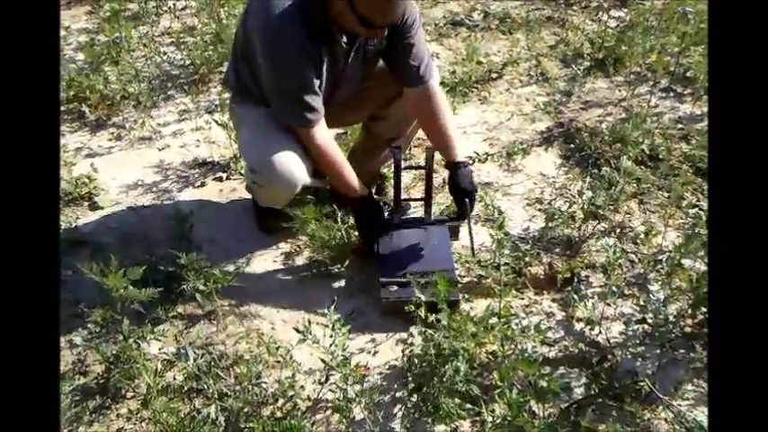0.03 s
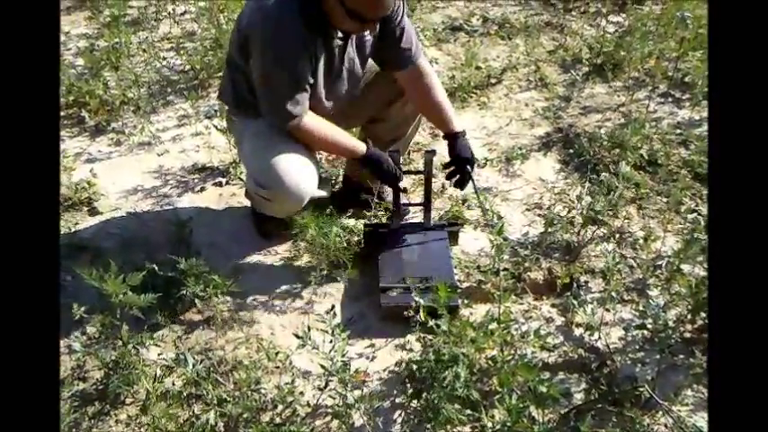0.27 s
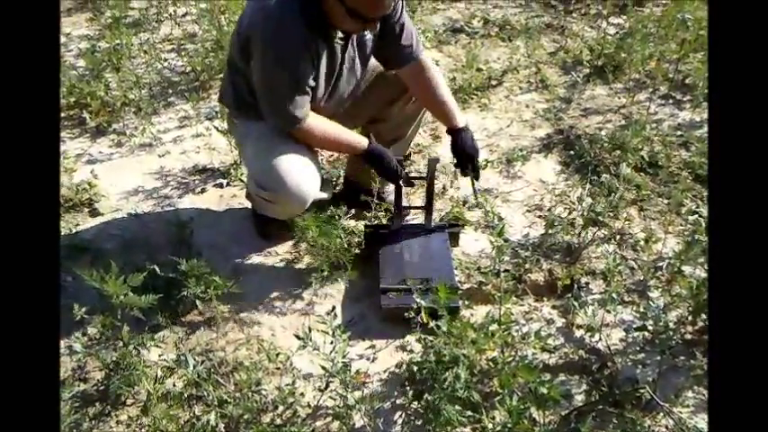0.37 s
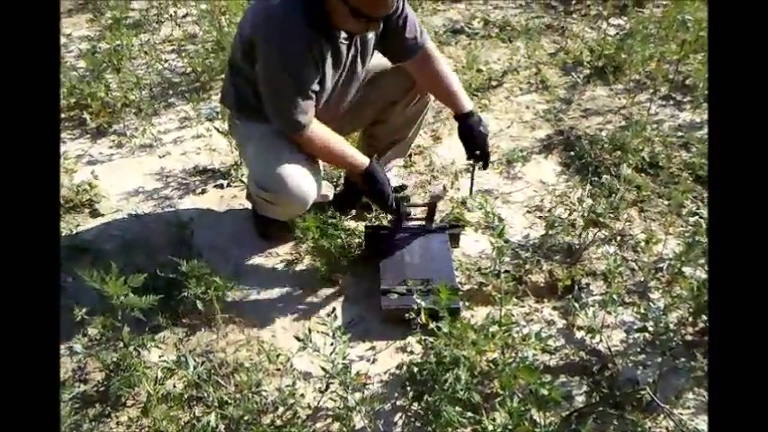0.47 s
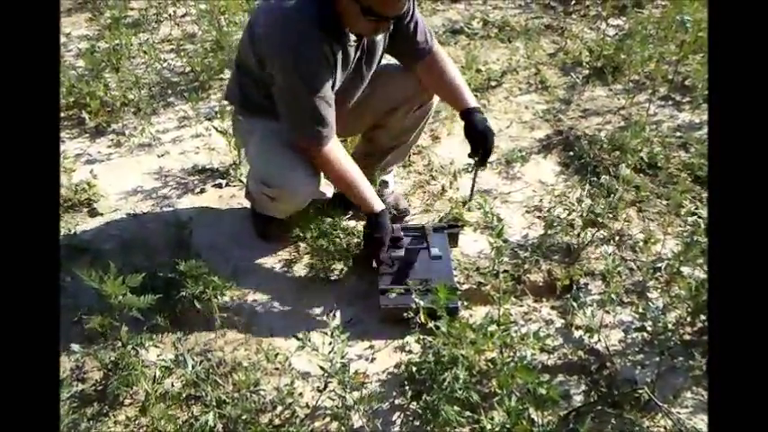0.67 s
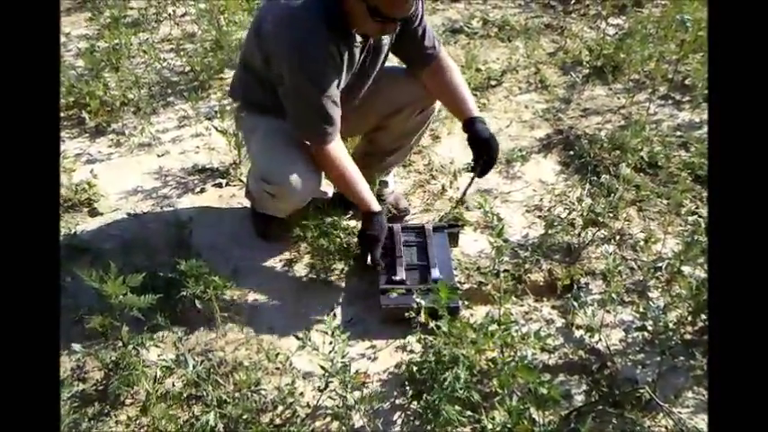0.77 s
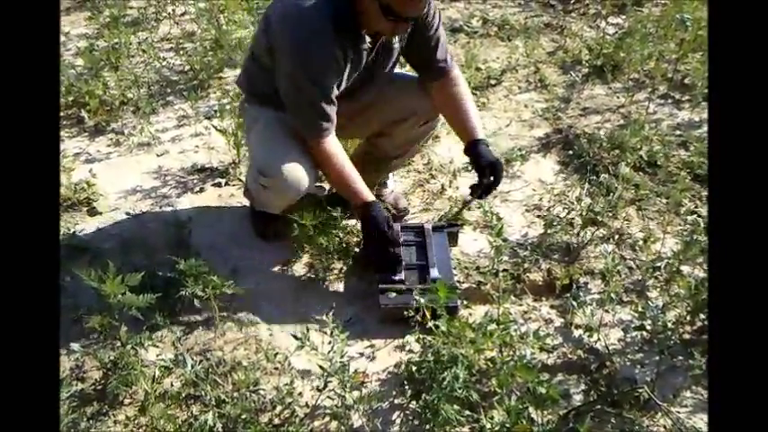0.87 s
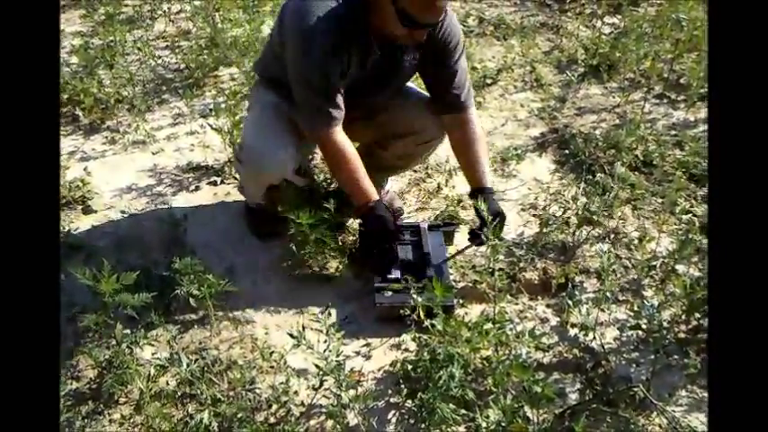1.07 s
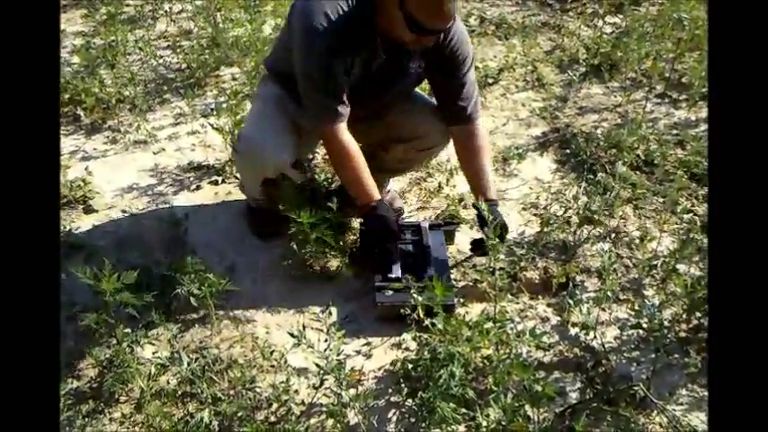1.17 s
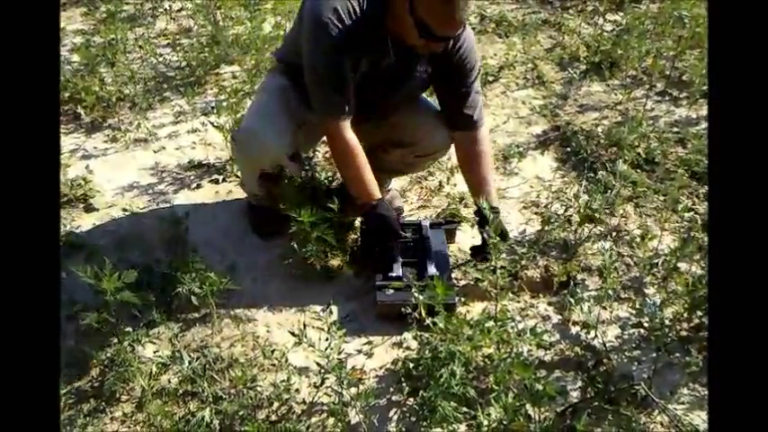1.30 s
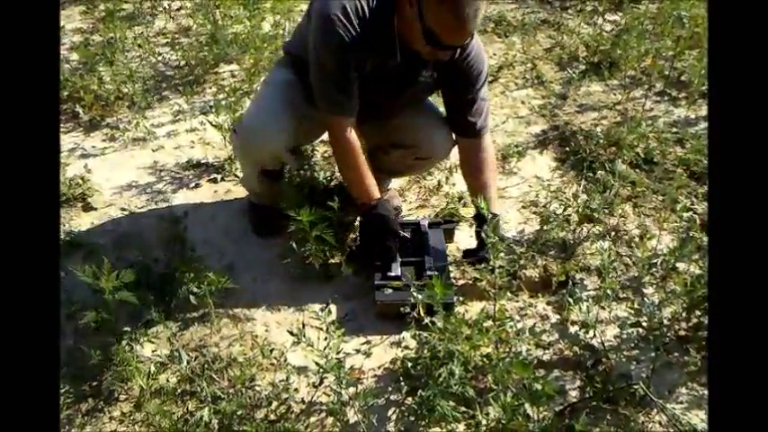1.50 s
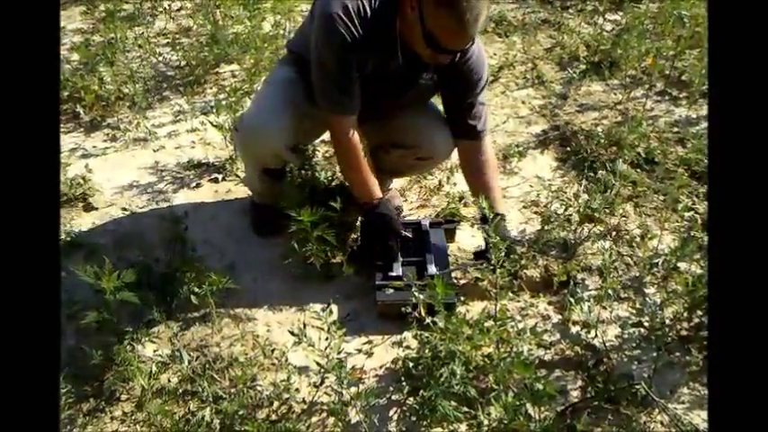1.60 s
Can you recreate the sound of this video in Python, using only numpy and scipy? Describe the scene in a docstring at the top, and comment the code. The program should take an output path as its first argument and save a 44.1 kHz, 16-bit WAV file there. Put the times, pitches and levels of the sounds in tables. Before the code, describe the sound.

Two sharp, rattling metal clanks come under a second apart as a steel device is closed outdoors, the first after a light tap, the second after a soft knock. They distort slightly above a low rumble and faint whirr.

```python
"""A steel device is folded shut by hand on dry ground, over a low rumble and a small drive's faint whirr.
Its arms give a light ringing tap (0.23 s), then the lid hits its catch with a hard clank (0.35 s).
A hand brushes the steel (0.95 s), the case takes a dull knock (1.05 s) and the frame clanks shut (1.13 s).
Each clank is a short rattle of contacts that rings the steel's modes and overloads the microphone."""
import sys
import numpy as np
from scipy import signal
from scipy.fft import rfft, irfft, next_fast_len
from scipy.io import wavfile
from scipy.ndimage import map_coordinates

SR = 44100
rng = np.random.default_rng(int(sys.argv[2]) if len(sys.argv) > 2 else 0)


def to_wav(s):
    """Save 16-bit WAV."""
    ch = np.atleast_2d(s).T  # columns
    pcm = np.round(np.clip(ch, -1, 1) * 32767)  # PCM
    wavfile.write(sys.argv[1], SR, pcm.astype(np.int16))


N = 72765
TIME_S = np.arange(N) / SR


def amp(db):
    """Decibels to gain."""
    return 10 ** (np.asarray(db) / 20)


def along(points, hz):
    """Interpolate (frequency, value) points on a log frequency axis."""
    knots_hz, values = np.transpose(points)
    return np.interp(np.log(hz + 1), np.log(knots_hz + 1), values)


def noise(response):
    """Noise of rms 1, coloured by the gain response(hz)."""
    size = next_fast_len(N + 8192)
    spectrum = rfft(rng.standard_normal(N), size) * response(np.fft.rfftfreq(size, 1 / SR))
    x = irfft(spectrum, size)[:N]
    return x / np.sqrt(np.mean(x ** 2) + 1e-20)


def wobble(rate_hz):
    """Smooth random curve with knots at rate_hz."""
    knots = rng.standard_normal(int(N * rate_hz / SR) + 4)
    return map_coordinates(knots, [TIME_S * rate_hz])


def add(out, x, start_s):
    """Mix x into out from start_s."""
    i = round(start_s * SR)
    out[i:] += x[:N - i]


def swish(offset_s, sigma_s, centre_hz, sigma_hz, peak_db):
    """Gaussian swell of narrow-band noise around offset 0."""
    envelope = amp(peak_db) * np.exp(-.5 * (offset_s / sigma_s) ** 2)
    return envelope * noise(lambda hz: np.exp(-.5 * ((hz - centre_hz) / sigma_hz) ** 2))


def background():
    """Fluttering rumble and hiss with a weak, slightly unsteady hum."""
    # hum lines (frequency [Hz], rms level [dB])
    lines = [(91, -46.5), (137, -49.5), (455, -49), (980, -46.5)]
    # rumble and hiss spectrum (frequency [Hz], relative density [dB])
    spectrum = [(30, -35), (65, -17), (85, -1), (160, 1), (450, 1), (820, -2.5), (1100, 1), (1850, 1),
                (2250, -9), (2550, -4.5), (3000, -13.5), (4000, -9), (5300, -7), (6500, -10.5),
                (7200, -19.5), (7700, -38.5)]
    hum = sum(amp(db) * np.sqrt(2) * np.sin(2 * np.pi * hz * TIME_S + .5 * wobble(7.06))
              for hz, db in lines)
    rumble_db = -30.5 + 0.45 * wobble(40.1)
    return hum + amp(rumble_db) * noise(lambda hz: amp(along(spectrum, hz)))


def drive():
    """A small mechanism rubs and ticks at the same places in every turn."""
    # swells per turn (time [s], sigma [s], centre [Hz], sigma [Hz], peak [dB])
    swells = [(0.046, 0.0089, 1210, 50, -33), (0.1002, 0.01, 1197, 45, -31.5),
              (.1405, 0.0036, 2020, 720, -28), (0.01, 0.0053, 1750, 230, -32)]
    turn_s = .1772
    return sum(swish((TIME_S - at_s + turn_s / 2) % turn_s - turn_s / 2, *shape)
               for at_s, *shape in swells)


def clatter(tilt_db_oct, t60_scale):
    """Dense sheet-steel modes: noise, tilted above about 1.5 kHz, that dies band by band."""
    # spectrum before tilt (frequency [Hz], relative density [dB])
    spectrum = [(60, -24.5), (200, -16.5), (550, -5), (1000, -3.5), (1900, 2.5), (2700, -1.5), (4300, -5.5),
                (5500, -1), (6700, 5.5), (7050, -2), (7400, -13)]
    # decay before scaling (frequency [Hz], t60 [s])
    decay = [(100, .09), (600, .11), (2000, 0.094), (4000, 0.11), (7000, .11)]
    steady = noise(lambda hz: amp(along(spectrum, hz) + tilt_db_oct * np.log2(1 + hz / 1500)))
    band_hz, age_s, bands = signal.stft(steady, SR, nperseg=256)
    t60_s = t60_scale * along(decay, band_hz)[:, None]
    fade = np.exp(-np.log(1000) * age_s / t60_s)
    return signal.istft(bands * fade, SR, nperseg=256)[1][:N]


def struck(modes, hits, tilt_db_oct, t60_scale, jitter_rad):
    """Each contact feeds energy into the part's modes and sets off a new clatter."""
    out = np.zeros(N)
    modes_rms = np.sqrt(sum(amp(db) ** 2 for _, db, _ in modes) / 2)
    for hz, mode_db, t60_s in modes:
        energy = np.zeros(N)
        fade = np.exp(-np.log(1000) * TIME_S / t60_s)
        for at_s, ring_db, _ in hits:
            gain = amp(mode_db + ring_db + rng.standard_normal())
            add(energy, (gain * fade) ** 2, at_s)
        phase_rad = 2 * np.pi * (hz * TIME_S + rng.random()) + jitter_rad * wobble(120)
        out += np.sqrt(energy) / modes_rms * np.sin(phase_rad)
    for at_s, _, clatter_db in hits:
        add(out, amp(clatter_db) * clatter(tilt_db_oct, t60_scale), at_s)
    return out


def hand_brush():
    """A hand brushes the steel: a brief high hiss."""
    return swish(TIME_S - .9545, sigma_s=.005, centre_hz=6400, sigma_hz=380, peak_db=-31)


def case_knock():
    """Two soft bumps ring the case's low modes."""
    # case modes (frequency [Hz], relative level [dB], t60 [s])
    modes = [(646, -2, 0.052), (941, -6, 0.06), (2060, -18, 0.14)]
    # contacts (time [s], ring [dB], clatter [dB])
    hits = [(1.052, -19, -24), (1.057, -19.5, -26.5)]
    return struck(modes, hits, tilt_db_oct=-0.5, t60_scale=0.57, jitter_rad=.25)


def arm_tap():
    """The folding arms touch twice and ring."""
    # arm modes (frequency [Hz], relative level [dB], t60 [s])
    modes = [(800, -11, .16), (870, -14, .14), (954, 0, .17), (1175, -15, .15), (1424, -13, .18),
             (1760, -3, .05), (1920, -4, .05), (2171, -8, .14), (2340, -14, .16), (3431, -14, .1),
             (5020, -13, .16), (5125, -15, .2), (5584, -4.5, .17), (6315, -6, .18), (6438, -14, .19),
             (6954, -3.5, .19), (7630, -17, .17)]
    # contacts (time [s], ring [dB], clatter [dB])
    hits = [(0.2283, -20, -22), (.2318, -13, -22)]
    return struck(modes, hits, tilt_db_oct=-5, t60_scale=2.43, jitter_rad=.08)


def catch_click():
    """The lid strikes the catch, whose modes die fast."""
    # catch modes (frequency [Hz], relative level [dB], t60 [s])
    modes = [(2988, -2.5, 0.02), (3333, 0.5, 0.038), (3704, -5, 0.048)]
    # contact (time [s], ring [dB], clatter [dB])
    hits = [(0.3464, 1.9, -3.5)]
    return struck(modes, hits, tilt_db_oct=-3, t60_scale=0.15, jitter_rad=0.32)


def lid_clank():
    """The lid slams over the catch and rattles."""
    # lid modes (frequency [Hz], relative level [dB], t60 [s])
    modes = [(620, -9, .09), (942, 2.5, .115), (1412, 0, .1), (1539, -7, .09), (2027, -1, .115),
             (2848, -12, .17), (3494, -4, .1), (4567, -5, .085), (4883, -3, .14), (5107, -9, .15),
             (5733, 3, .11), (6543, -3, .11), (6841, 1, .13), (6968, -3, .125)]
    # contacts (time [s], ring [dB], clatter [dB])
    hits = [(0.3462, -4, -2.5), (0.352, -0.5, 1), (0.3663, -5, 0), (.377, -14, -5.5)]
    return struck(modes, hits, tilt_db_oct=-1, t60_scale=1.0, jitter_rad=0.29)


def frame_clank():
    """The frame that the lid locks into snaps shut in a bright rattle."""
    # frame modes (frequency [Hz], relative level [dB], t60 [s])
    modes = [(614, -10, .12), (941, -5, .11), (1430, -10, .1), (2002, -8, .1), (2100, -9, .11),
             (3566, -3, .115), (3735, -8, .09), (3958, -11, .12), (4833, -9, .14), (5163, -8, .12),
             (5425, 3.5, .1), (6223, -1, .13), (6579, -1, .135), (6719, -10, .25), (6935, -3, .14),
             (7215, -24, .5)]
    # contacts (time [s], ring [dB], clatter [dB])
    hits = [(1.12, -40, -18.5), (1.128, -12, -19), (1.1284, 2.5, 1.5), (1.1416, 1.5, -2), (1.152, -8, -2.5),
            (1.1613, -29, -7)]
    return struck(modes, hits, tilt_db_oct=1.56, t60_scale=0.92, jitter_rad=0.52)


def scene():
    """Mono sum at the microphone."""
    device = arm_tap() + catch_click() + lid_clank() + hand_brush() + case_knock() + frame_clank()
    return (device + background() + drive())[None]


def low_pass(x, cutoff_hz):
    """Steep causal elliptic low-pass."""
    return signal.sosfilt(signal.ellip(8, .3, 80, cutoff_hz, fs=SR, output="sos"), x)


def record(dry):
    """The microphone stage saturates, its narrow band cuts the treble, and remaining peaks clip hard."""
    overload_level, knee = 0.97, 6.9
    saturated = dry[0] / (1 + np.abs(dry[0] / overload_level) ** knee) ** (1 / knee)
    clipped = np.clip(low_pass(saturated, cutoff_hz=7520), -1, 1)
    return low_pass(clipped, cutoff_hz=15900)[None]


dry = scene()
out = record(dry)
to_wav(out)
```